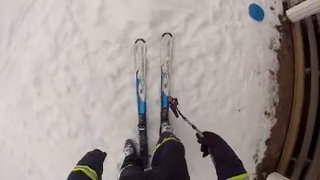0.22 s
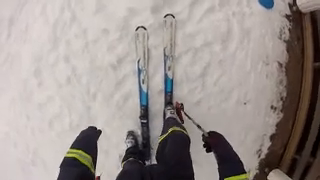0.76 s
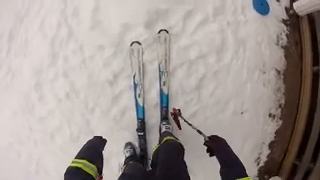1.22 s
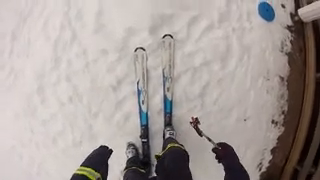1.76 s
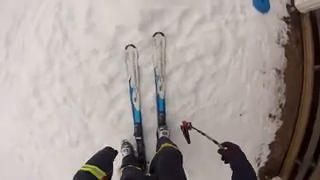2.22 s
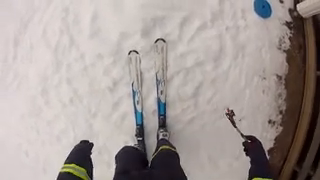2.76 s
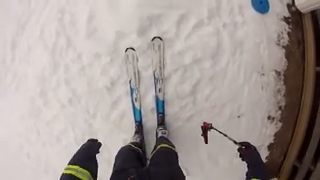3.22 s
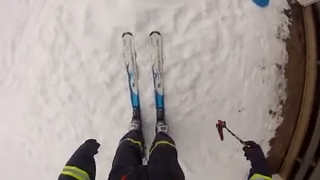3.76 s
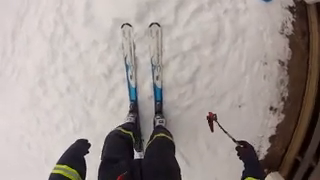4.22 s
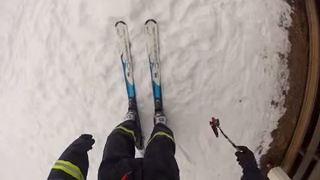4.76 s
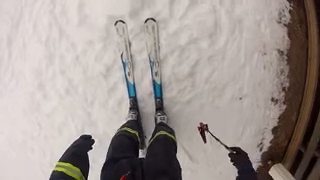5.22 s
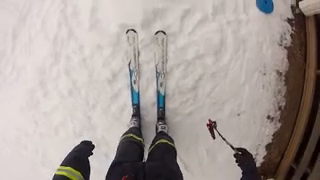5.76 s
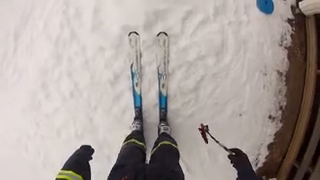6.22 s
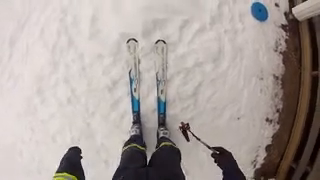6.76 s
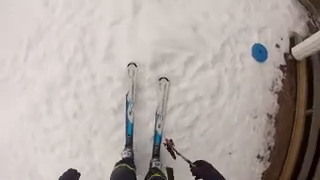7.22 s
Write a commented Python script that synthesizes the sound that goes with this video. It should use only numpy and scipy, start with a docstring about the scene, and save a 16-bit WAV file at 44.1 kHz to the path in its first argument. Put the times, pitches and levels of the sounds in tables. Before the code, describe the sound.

A skier shifts in place on packed snow, heard close from a body-worn camera, with slightly dulled highs and a quiet open-air bed under low wind rumble. At 0.1 s a hollow ski knock lands with humming base rub; a pole crunches in at 0.25 s, followed by small slips until 0.65 s. It is then sparse until a light clack at 1.3 s and faint pole taps at 1.45 and 1.6 s. Knocks gather from 1.8 s, bursting into sharp clacks and a short scrape at 2.5 s. A bright, icy pole stab cracks at 2.9 s. Dull knocks and weak pole pokes scatter from 3.7 to 5.0 s, thinning to a softer plant at 5.9 s and a click at 6.0 s. The strongest pole crack and crunch hits at 6.7 s, with loud clacks and rasp at 6.8 s, then smaller knocks to 7.2 s. Low swinging thumps accompany the movements.

```python
"""Skis and bindings clack and ring as a skier shuffles on the spot on packed snow, heard at a body-worn camera.
Blows and short bursts of clicks excite resonances of boot, ski and binding; the bases rub as noisy, humming slips.
Pole tips crack the crust with bursts that ring in the shaft, and the snow crunches as clumps of random snaps.
Each move jolts the camera mount with low swinging thumps; shaped noise makes the light wind and the open air."""
import sys
import numpy as np
from scipy import signal
from scipy.fft import rfft, irfft
from scipy.io import wavfile

SR = 44100
rng = np.random.default_rng(int(sys.argv[2]) if len(sys.argv) > 2 else 0)


def digitize_waveform(pressure):
    """Quantize a signal to 16-bit integers and store it at the path in sys.argv[1].

    Rows of a 2-D input are taken as channels; values are limited to [-1, 1].
    """
    field = np.atleast_2d(pressure).T
    bounded = np.clip(field, -1, 1)
    quanta = np.round(bounded * 32767).astype(np.int16)
    wavfile.write(sys.argv[1], SR, quanta)


N = 329427
TIME = np.arange(N) / SR
HIT_TIME = TIME[:SR // 4]

# Event levels are faders ahead of the layer trims in scene(); resonance and spectrum levels are relative.
# a ski is set down: [t/s, level/dB, hardness (0 flat on soft snow, 1 sharp rap on the binding),
# level of the weight behind it/dB]
SKI_CONTACTS = [(0.129, -28.5, 0.15, -41), (0.147, -41, 0.73, -68), (0.377, -41, 0.34, -54),
                (1.342, -41, 1, -58), (1.803, -48, 0.26, -64), (1.976, -50, 0.15, -38),
                (2.036, -42, 0.38, -62), (2.106, -37.5, 0.15, -45.5), (2.24, -47.5, .3, -50.5),
                (2.353, -37, 0.72, -53), (2.496, -35, 0.75, -51), (2.514, -38, 0.44, -40),
                (2.524, -28.5, 0.7, -45), (3.006, -44.5, 0.73, -60), (3.854, -48, 0.39, -62),
                (3.889, -32.5, 0.2, -41.5), (4.029, -45.5, 0.56, -55), (4.071, -34.5, 0.28, -41.5),
                (4.49, -39.5, 0.56, -55.5), (4.62, -44, 0.13, -46), (4.631, -44, .5, -45),
                (4.669, -45.5, 0.58, -54), (4.692, -34, 0.17, -43.5), (4.777, -41, 0.41, -41.5),
                (5.03, -42, 0.17, -53), (6.021, -37.5, 0.7, -48), (6.629, -45.5, 0.78, -52.5),
                (6.805, -26.5, 0.67, -52), (6.847, -27, 0.23, -37), (7.049, -46, .85, -58),
                (7.216, -36, 0.55, -60)]
# resonances of the boot: [f/Hz, width/Hz, level/dB]
BOOT_MODES = [(211, 66, -15.5), (260.5, 24, -7.5)]
# ringing of the ski, before detuning and damping: [f/Hz, width/Hz, level/dB]
SKI_RING_MODES = [(348.7, 31, -3), (431.5, 38, 3), (560, 250, -9)]
# clack of the ski, before detuning and damping: [f/Hz, width/Hz, level/dB]
SKI_CLACK_MODES = [(613, 110, 1), (828, 64, 3), (1050, 130, 1.5), (1246, 200, -1)]
# rattle of the binding: [f/Hz, width/Hz, level/dB]
BINDING_MODES = [(1677, 133, 5.5), (2050, 490, -3.5), (2730, 500, -8), (3390, 490, -12.5), (4260, 490, -16),
                 (7950, 600, -22.5)]
# the ski base is pushed over the snow: [t of greatest force/s, level/dB, rise/s, fall/s]
BASE_PUSHES = [(0.15, -49, 0.041, 0.051), (0.31, -57.5, 0.039, 0.013), (0.39, -58, 0.018, 0.044),
               (0.485, -54.5, 0.035, 0.036), (0.642, -54.5, 0.019, 0.036), (2.05, -55, 0.038, 0.042),
               (2.165, -56, 0.03, 0.055), (2.52, -43, 0.026, 0.0043), (6.92, -61.5, 0.11, 0.25)]
# hum of the rubbed ski: [f/Hz, width/Hz, level/dB]
BASE_HUM_MODES = [(341.5, 17, -5), (421.4, 20, 2), (549, 320, -16), (707, 182, -12.5)]
# a pole is planted: [t/s, level/dB, brightness/dB, f of the shaft/Hz, level of the snow packing under
# the basket/dB, build-up of the packing/s, level of the weight on the pole/dB]
POLE_PLANTS = [(0.2493, -30.5, -6, 1860, -56, 0.018, -43), (1.4513, -49.5, -6, 2020, -72, .01, -76),
               (1.618, -42.5, 2.5, 2050, -55.5, 0.0083, -51), (2.8733, -31.5, 7, 2000, -46.5, 0.0083, -58),
               (3.706, -44.5, -7, 2120, -59, 0.056, -53), (4.357, -50, 3, 1990, -59.5, 0.021, -74),
               (4.3821, -42.5, -3, 1950, -66.5, 0.014, -69), (4.901, -53.5, -2, 1976, -71, .01, -76),
               (5.3448, -56, -2, 2000, -75, .01, -62.5), (5.8066, -58.5, -6, 2020, -78, .01, -65),
               (5.8308, -54.5, -10, 2050, -83, .01, -67), (5.9359, -44, -7, 2024, -62.5, .004, -45.5),
               (6.6893, -21.5, 2, 2067, -40.5, 0.016, -31)]
# lower shaft resonances, listed for a shaft at SHAFT_HZ: [f/Hz, width/Hz, level/dB]
SHAFT_LOW_MODES = [(1908, 56, 6.5), (2110, 130, -21), (2016, 49, 8)]
# upper shaft resonances: [f/Hz, width/Hz, level/dB]
SHAFT_HIGH_MODES = [(2450, 130, -21), (3186, 190, 18), (3430, 195, 13), (4120, 360, -12)]
# low crack of the crust: [f/Hz, width/Hz, level/dB]
CRUST_MODES = [(252, 89, 0), (570, 980, -9), (1066, 130, -0.5), (1270, 52, -18)]
# icy fizz: [f/Hz, width/Hz, level/dB]
ICE_MODES = [(4150, 210, 6.5), (4940, 300, 4), (5140, 3900, -7.5), (7600, 660, -4), (8610, 190, -3.5)]
# what a plant sends up the arm: [f/Hz, width/Hz, level/dB]
ARM_MODES = [(136, 39, 0), (230, 180, -3.5)]
# squeak of packing snow: [f/Hz, width/Hz, level/dB]
SNOW_MODES = [(1983, 176, 5), (2640, 210, -5.5), (3085, 310, -5), (4640, 430, -10)]
# faint drags over the snow: [t of greatest force/s, level/dB, rise/s, fall/s]
SNOW_DRAGS = [(0.11, -63, .07, 0.28), (0.85, -75, 0.24, 0.91), (1.73, -67, .06, .08),
              (2.45, -69.5, 0.095, 0.24), (3.8, -70, 0.16, 0.37), (5.95, -77, 0.059, 0.11),
              (6.825, -52.5, .03, 0.031), (7.08, -65.5, 0.31, 0.23)]
# tone of the dragging rasp: [f/Hz, width/Hz, level/dB]
RASP_MODES = [(1860, 340, 3), (2200, 870, -6.5), (3490, 550, -10.5)]
# the body shifts its weight without a knock: [t/s, level of the bounce/dB, sway against the bounce/dB]
BODY_SHIFTS = [(0.104, -40.5, 0), (0.163, -33, -0.5), (0.297, -40.5, 2), (0.454, -45.5, -20),
               (1.145, -35, -6), (1.706, -48, 1.5), (2.932, -49.5, 7), (3.974, -48.5, 3),
               (6.656, -48.5, 14.5), (7.024, -45, -21), (7.087, -39, -4)]
# light wind: [t/s, level of the rumble/dB]
BREEZE = [(0.0, -53), (0.25, -49), (0.66, -63), (2.21, -54.5), (3.06, -57.5), (4.66, -60), (5.22, -60.5),
          (6.03, -65), (6.18, -66), (6.45, -62.5), (6.74, -56), (7.47, -58)]
# colour of the wind rumble: [f/Hz, level per Hz/dB]
WIND_SPECTRUM = [(15, 13), (30, 7.5), (55, 1.5), (95, 0), (125, -24), (200, -15.5), (320, -66)]
# colour of the open air: [f/Hz, level per Hz/dB]
AIR_SPECTRUM = [(70, -34.5), (130, -3.5), (210, -4.5), (330, -6.5), (450, -12), (800, -14.5), (1500, -21),
                (2050, -21.5), (2700, -23), (4800, -28), (7000, -33), (9000, -35.5), (9600, -83)]

SOFT_DAMPING = 0.4  # ring width of the softest contact, as a share of that of the hardest rap
THUD_WEIGHT_SHARE = 0.45  # how far the boot's thud follows the weight instead of the knock level
CRACK_WEIGHT_SHARE = 0.33  # how far the crust's crack follows the weight instead of the plant level
SHAFT_HZ = 2000
PACK_DELAY_S, PACK_FALL_S = 0.012, 0.035  # the snow packs hardest just after the tip goes in
SETTLE_DB, SETTLE_S, SETTLE_UNEVEN_DB = -18.5, 0.11, 2.5  # then loose crystals settle in clumps
MOUNT_HZ = 74.6  # bounce of the camera on its mount
JOLT_LEAD_S = 0.0032  # a jolt starts ahead of the listed contact
LEG_SWAY_DB, ARM_SWAY_DB = -12.5, 4  # a pole plant rocks the body more than a step
STIR_DB, STIR_RISE_S, STIR_FALL_S = -2.5, 0.019, 0.15  # air stirred by a plant, against its weight
CUTOFF_HZ = 9700


def ski_knocks(thud_db, ring_db, clack_db, click_db):
    """The blow rings boot and ski; harder contacts ring less, damp faster and chatter more at the binding."""
    out = np.zeros(N)
    for s, level, hardness, weight in SKI_CONTACTS:
        damping = SOFT_DAMPING + (1 - SOFT_DAMPING) * hardness
        chatter = contact(rise_s=0.00016, hold_s=0.00078, fall_s=0.0047, tail_db=-24.0, tail_s=0.029)
        blow = np.exp(-HIT_TIME / 0.0033) + 0.033 * chatter

        thud = resonate(blow, BOOT_MODES)
        ring = resonate(blow, detuned(SKI_RING_MODES, 0.032, damping))
        clack = resonate(chatter, detuned(SKI_CLACK_MODES, 0.026, damping))
        click = high_pass(resonate(chatter, BINDING_MODES), 810)

        add(out, s, hit_level(thud, level + THUD_WEIGHT_SHARE * (weight - level) + thud_db))
        add(out, s, hit_level(ring, level - 12 * hardness + ring_db))
        add(out, s, hit_level(clack, level + clack_db))
        add(out, s, hit_level(click, level + 15.4 * hardness + click_db))
    return out


def ski_rub(force, judder_db):
    """The base slips over the snow in random snaps of drifting strength that keep the ski humming."""
    slips = grains(N, per_s=1400, spread_db=2.5) * from_db(judder_db * drift(27))
    return force * rms_one(resonate(slips, BASE_HUM_MODES))


def pole_stabs(low_db, high_db, crack_db, fizz_db, thud_db, lead_s):
    """The tip cracks the crust in a burst of fractures that ring in the shaft and thud up the arm."""
    out = np.zeros(N)
    for s, level, bright, pitch, *_, weight in POLE_PLANTS:
        fractures = contact(rise_s=0.0013, hold_s=0.0075, fall_s=0.0013, tail_db=-19, tail_s=0.046)
        tuned = [(hz * pitch / SHAFT_HZ, width, db) for hz, width, db in SHAFT_LOW_MODES]

        shaft_low = high_pass(resonate(fractures, tuned), 1500)
        shaft_high = high_pass(resonate(fractures, SHAFT_HIGH_MODES), 2700)
        crack = resonate(fractures, CRUST_MODES)
        fizz = high_pass(resonate(fractures, ICE_MODES), 6000)
        thud = resonate(fractures, ARM_MODES)

        # icy spots are brighter; a heavier lean gives a stronger crack
        shaft = hit_level(shaft_low, level + low_db)
        shaft += hit_level(shaft_high, level + bright + high_db)
        crust = hit_level(crack, level + CRACK_WEIGHT_SHARE * (weight - level) + crack_db)
        crust += hit_level(fizz, level + bright + fizz_db)
        add(out, s - lead_s, shaft + crust + hit_level(thud, weight + thud_db))
    return out


def packing():
    """Force on the snow under the basket: after each plant it peaks, eases off and settles unevenly."""
    press = [(s + PACK_DELAY_S, db, rise, PACK_FALL_S) for s, *_, db, rise, _ in POLE_PLANTS]
    settle = load([(s, db + SETTLE_DB, rise, SETTLE_S) for s, db, rise, _ in press])
    return load(press) + settle * from_db(SETTLE_UNEVEN_DB * drift(23))


def snow_crunch(force, modes, crack_db, fizz_db, clump_db):
    """Crystals give way in clumps of snaps; the low crack of deeper layers grows faster than the force."""
    snaps = grains(N, per_s=3000, spread_db=2.5) * from_db(clump_db * drift(66))
    squeak = rms_one(high_pass(resonate(snaps, modes), 1600))
    depth = (force / force.max()) ** 0.22
    crack = from_db(crack_db) * depth * rms_one(resonate(snaps, CRUST_MODES))
    fizz = from_db(fizz_db) * rms_one(high_pass(resonate(snaps, ICE_MODES), 6000))
    return force * (squeak + crack + fizz)


def mount_jolts(bounce_db, strap_db, sway_db):
    """At each step, plant or shift the camera bounces, its straps shudder, and it rocks slower with the body."""
    out = np.zeros(N)
    strap_band = signal.butter(2, [78, 104], "band", fs=SR, output="sos")
    steps = [(s - JOLT_LEAD_S, weight, LEG_SWAY_DB) for s, *_, weight in SKI_CONTACTS]
    plants = [(s - JOLT_LEAD_S, weight, ARM_SWAY_DB) for s, *_, weight in POLE_PLANTS]
    for s, db, rock in steps + plants + list(BODY_SHIFTS):
        straps = rms_one(signal.sosfilt(strap_band, rng.standard_normal(len(HIT_TIME))))
        shake = swing(MOUNT_HZ) + from_db(strap_db) * straps
        sway = swing(hz=rng.uniform(29, 59.4))
        add(out, s, from_db(db + bounce_db) * swell(rise_s=0.02) * shake)
        add(out, s, from_db(db + rock + sway_db) * swell(rise_s=0.016) * sway)
    return out


def wind(breeze_db):
    """Low noise on the microphone, driven by the breeze and by the air stirred when leaning on a pole."""
    s, level_db = np.transpose(BREEZE)
    breeze = from_db(np.interp(TIME, s, level_db) + breeze_db)
    stir = load([(s, weight + STIR_DB, STIR_RISE_S, STIR_FALL_S) for s, *_, weight in POLE_PLANTS])
    return (breeze + stir) * rms_one(high_pass(coloured_noise(WIND_SPECTRUM), 15.2))


def open_air(level_db):
    """A steady bed of shaped noise for the open air."""
    return from_db(level_db) * coloured_noise(AIR_SPECTRUM)


def contact(rise_s, hold_s, fall_s, tail_db, tail_s):
    """A contact builds up and chatters in random clicks for a few ms, then loose snow settles."""
    grip = np.exp(-np.maximum(HIT_TIME - hold_s, 0) / fall_s)
    settling = from_db(tail_db) * np.exp(-HIT_TIME / tail_s)
    onset = 1 - np.exp(-HIT_TIME / rise_s)
    return (grip + settling) * onset * grains(len(HIT_TIME), per_s=7000, spread_db=0.0)


def detuned(modes, spread, damping):
    """Each place of contact shifts the resonances a little at random; damping scales their widths."""
    return [(hz * (1 + spread * rng.standard_normal()), width * damping, db) for hz, width, db in modes]


def resonate(x, modes):
    """Parallel two-pole resonances with alternating signs."""
    out = 0
    for k, (hz, width, db) in enumerate(modes):
        r = np.exp(-np.pi * width / SR)
        poles = [1, -2 * r * np.cos(2 * np.pi * hz / SR), r * r]
        gain = (-1) ** k * from_db(db) * (1 - r * r) / 2
        out = out + gain * signal.lfilter([1, 0, -1], poles, x + 1e-18)
    return out


def grains(size, per_s, spread_db):
    """Random clicks of either sign; spread_db makes some of them stronger."""
    born = rng.random(size) < per_s / SR
    sign = rng.choice([-1, 1], size)
    return born * sign * from_db(spread_db * np.minimum(rng.exponential(1, size), 4))


def load(rows):
    """Weight comes on and eases off again, exponentially on both sides of its peak."""
    total = 0
    for s, db, rise, fall in rows:
        total = total + from_db(db) * np.exp(-np.maximum((s - TIME) / rise, (TIME - s) / fall))
    return total


def swell(rise_s):
    """A smooth rise to 1 and a longer fall."""
    age = HIT_TIME / rise_s
    return age ** 2 * np.exp(2 * (1 - age))


def swing(hz):
    """A steady swing that starts anywhere in its cycle."""
    return np.sin(2 * np.pi * (hz * HIT_TIME + rng.random()))


def drift(rate_hz):
    """Slow random wander with a spread of about 1, made at 1/40 of the sample rate."""
    r = np.exp(-80 * np.pi * rate_hz / SR)
    noise = rng.standard_normal(N // 40 + 2002)
    slow = signal.lfilter([1], [1, -2 * r, r * r], noise)[2000:]  # drop the run-in
    return np.interp(np.arange(N) / 40, np.arange(len(slow)), rms_one(slow))


def coloured_noise(spectrum):
    """Smooth noise with the given spectrum, at unit rms."""
    hz, db = np.transpose(spectrum)
    bins = np.maximum(np.fft.rfftfreq(N, 1 / SR), 1)
    gain = from_db(np.interp(np.log(bins), np.log(hz), db))
    return rms_one(irfft(rfft(rng.standard_normal(N)) * gain, N))


def high_pass(x, hz):
    """Take away what lies under hz."""
    return signal.sosfilt(signal.butter(2, hz, "high", fs=SR, output="sos"), x)


def from_db(db):
    """Decibels to gain."""
    return 10 ** (np.asarray(db) / 20)


def rms_one(x):
    """Scale to unit rms."""
    return x / np.sqrt(np.mean(x ** 2) + 1e-20)


def hit_level(x, db):
    """Scale a hit so that its energy, spread over 10 ms, has this level."""
    return from_db(db) * x / np.sqrt(np.sum(x ** 2) / (0.01 * SR) + 1e-20)


def add(track, s, sound):
    """Mix a sound into the track at time s."""
    start = max(0, round(s * SR))
    track[start:start + len(sound)] += sound[:N - start]


def scene():
    """Mix skis, poles, snow, mount, wind and open air."""
    knocks = ski_knocks(thud_db=-14, ring_db=-6, clack_db=-20.0, click_db=-27.5)
    rub = ski_rub(load(BASE_PUSHES) + from_db(-78.0), judder_db=2.5)  # a faint rub never stops
    stabs = pole_stabs(low_db=-9.5, high_db=-18.5, crack_db=-14, fizz_db=-27, thud_db=-16, lead_s=0.0018)
    crunch = snow_crunch(packing(), SNOW_MODES, crack_db=-5, fizz_db=-10, clump_db=2.0)
    rasp = snow_crunch(load(SNOW_DRAGS), RASP_MODES, crack_db=0.5, fizz_db=-15.5, clump_db=1.5)
    jolts = mount_jolts(bounce_db=5.0, strap_db=-12, sway_db=5.5)
    background = wind(breeze_db=5) + open_air(level_db=-63.5)
    return (knocks + rub + stabs + crunch + rasp + jolts + background)[None]


def record(dry):
    """A steep elliptic low-pass cuts the top."""
    return signal.sosfilt(signal.ellip(10, 0.3, 70, CUTOFF_HZ, fs=SR, output="sos"), dry)


dry = scene()
out = record(dry)
digitize_waveform(out)
```